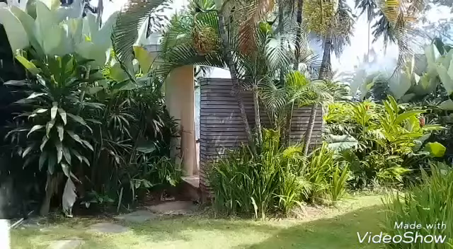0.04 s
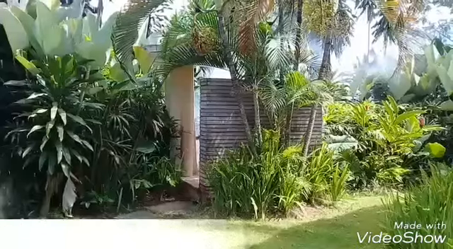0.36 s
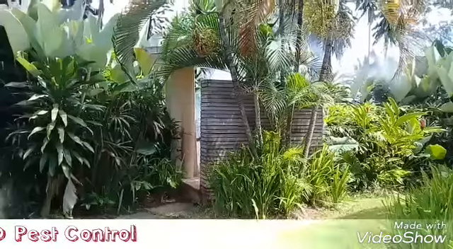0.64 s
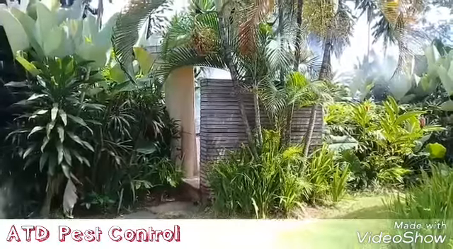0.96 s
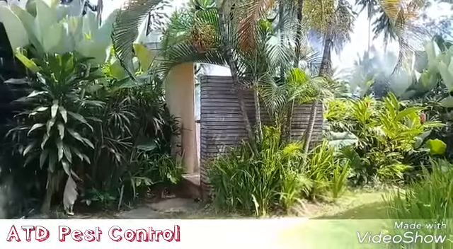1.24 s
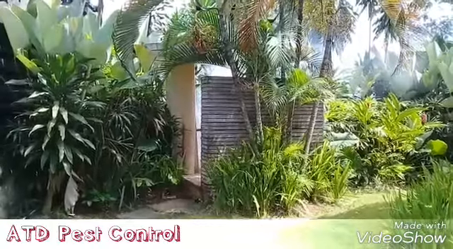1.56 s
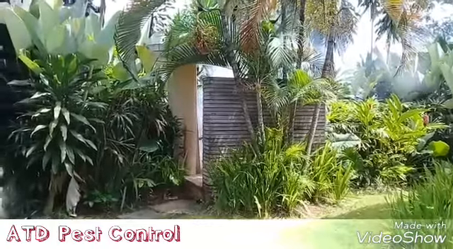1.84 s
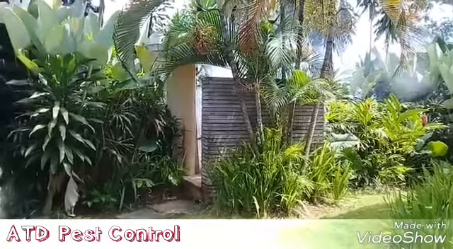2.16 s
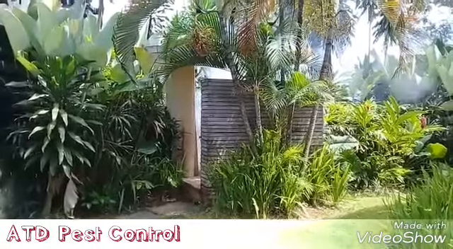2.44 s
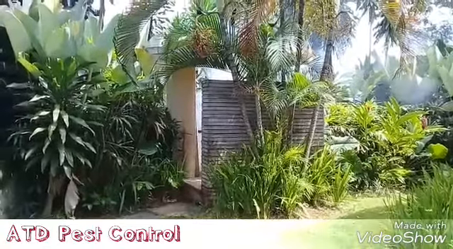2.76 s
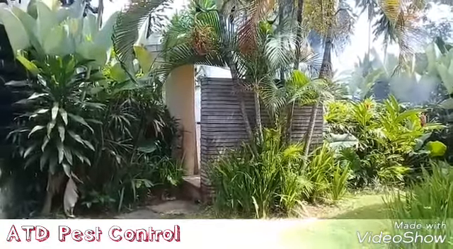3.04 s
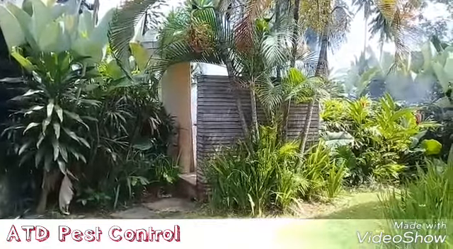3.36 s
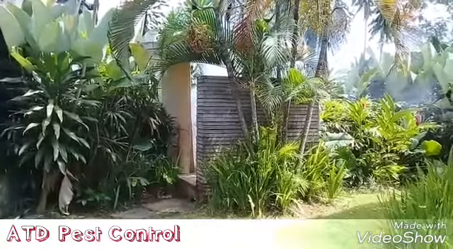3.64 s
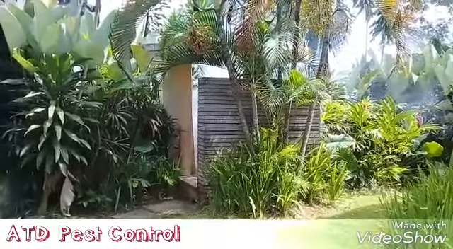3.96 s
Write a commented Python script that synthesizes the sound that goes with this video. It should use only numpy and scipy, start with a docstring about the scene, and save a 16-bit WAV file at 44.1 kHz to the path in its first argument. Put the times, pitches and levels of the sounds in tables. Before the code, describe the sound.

A pulse-jet fogging machine runs in a garden. After silence, it fades in from about 0.4 seconds and reaches full level by 0.7 seconds. It then roars continuously until the end at about 4 seconds, its very rapid firing merging into a low, rough buzz of steady pitch. A hollow ring from the pipe and a rushing nozzle hiss accompany the drone, wavering only slightly in loudness.

```python
"""After a brief silence, the sound of a pulse-jet fogging machine in a garden fades in.
It then runs steadily to the end, firing about 81 times a second. The periodic swing of its gas
column drones, and each firing strikes the exhaust's resonances with a bark. The turbulent exhaust
rings the modes of the long fogging pipe, then leaves the nozzle as a hissing jet."""
import sys
import numpy as np
from scipy import signal
from scipy.fft import rfft, irfft
from scipy.io import wavfile

SR = 44100
rng = np.random.default_rng(int(sys.argv[2]) if len(sys.argv) > 2 else 0)


def inscribe(sig):
    """Save sig as 16-bit PCM at rate SR to the path in sys.argv[1].

    A 1-D sig is mono; a 2-D sig holds one channel per row.
    Samples are clipped to [-1, 1] before scaling.
    """
    pcm = np.round(np.clip(np.atleast_2d(sig).T, -1, 1) * 32767)
    wavfile.write(sys.argv[1], SR, pcm.astype(np.int16))


N = 176400
TIME_S = np.arange(N) / SR
FADE_START_S, FADE_S = 0.43, 0.31
FIRING_PHASE = 0.6   # place of the firing in its cycle, 0 to 1

# Loudest harmonic, the third, before trim: time_s, level_db
THIRD_LEVEL = [(0.74, -12), (0.77, -12), (1.31, -9.5), (1.5, -11), (1.63, -9), (2.48, -8), (2.88, -11),
               (2.95, -9.5), (3.15, -13), (3.47, -9.5), (3.92, -12), (3.95, -11.5)]
# Its neighbours, before trim: time_s, first_db, second_db, fourth_db, fifth_db
NEIGHBOUR_LEVELS = [(0.76, -18.5, -15.5, -30, -28.5), (1.28, -20.5, -18.5, -23, -29),
                    (1.72, -18, -23, -24.5, -22.5), (1.84, -19, -21, -32, -40),
                    (1.95, -18, -22.5, -25, -32.5), (2.83, -19.5, -22.5, -26, -28.5),
                    (2.96, -18, -25, -19.5, -36), (3.13, -15.5, -19.5, -20, -34),
                    (3.84, -18.5, -24, -23, -31.5), (3.9, -21, -25, -31.5, -25.5)]
# Harmonics one to five, a row each: trim_db, flutter_db
HARMONIC_TRIMS = [(0, 0.43), (-0.55, 0.5), (0, 0.58), (-0.1, 0.6), (-2.5, 2.3)]
# Harmonics six to nine, before swell and flutter: level_db
BUZZ_LEVELS = [-39.5, -37, -34.5, -37]

def drone(cycles):
    """Periodic oscillation: the gas column swings at harmonics of the firing rate."""
    flutter_per_s, buzz_flutter_db, dispersion_rad = 11.6, 1.4, 0.704
    firing_hz = cycles[-1] * SR / N
    first, second, fourth, fifth = curves(NEIGHBOUR_LEVELS)
    third, = curves(THIRD_LEVEL)
    levels_db = []
    for db, (trim_db, flutter_db) in zip((first, second, third, fourth, fifth), HARMONIC_TRIMS):
        levels_db.append(db + trim_db + flutter_db * drift(flutter_per_s))
    for k, db in enumerate(BUZZ_LEVELS, 6):
        levels_db.append(db + swell_db(k * firing_hz) + buzz_flutter_db * drift(flutter_per_s))
    tone = np.zeros(N)
    for k, db in enumerate(levels_db, 1):
        shift_rad = dispersion_rad * (k - 3) ** 2   # dispersion in the pipe, about the third harmonic
        tone -= np.sqrt(2) * from_db(db) * np.cos(2 * np.pi * k * cycles + shift_rad)
    return tone


# Exhaust resonances, before swell: pitch_hz, width_hz, level_db
EXHAUST_MODES = [(401.5, 39, -40.5), (509, 56, -43.5), (696, 99, -37.5), (1090, 150, -41)]

def bark(cycles):
    """Impulse response: each firing, uneven in time and strength, strikes the exhaust's resonances."""
    jitter_s, spread_db = 0.00013, 4
    count = int(cycles[-1])
    start_s = np.interp(np.arange(count) + FIRING_PHASE, cycles, TIME_S)
    lateness, strength = rng.standard_normal((count, 2)).T
    onsets = ((start_s + jitter_s * lateness) * SR).astype(int)
    pulses = np.zeros(N)
    pulses[np.clip(onsets, 0, N - 1)] = from_db(spread_db * strength)
    return ring(pulses, EXHAUST_MODES)


# Standing waves of the fogging pipe, before swell: pitch_hz, width_hz, level_db
PIPE_MODES = [(360, 28, -29), (416.6, 25, -33.5), (737.8, 32, -35), (908, 25, -37), (1074, 13.4, -36.5),
              (1105.3, 25.4, -33.5), (1295.6, 29.4, -37), (1484, 37, -39.5), (1627, 35, -38.5),
              (1822, 12.5, -39.5), (1963, 56, -41), (2010, 71, -38.5), (2188, 33, -38), (2390, 48, -44),
              (2590, 70, -41.5), (2735, 67, -47), (2878, 34, -50), (3276, 92, -48)]

def pipe(cycles):
    """Forced resonance: puffs of turbulence sustain the pipe's standing waves."""
    return ring(turbulence(cycles, depth=0.36), PIPE_MODES)


# Spectral density of the jet: frequency_hz, density_db_per_hz
JET_SPECTRUM = [(20, -75), (45, -68), (65, -53), (100, -58.5), (150, -52.5), (185, -53.5), (280, -50.5),
                (450, -56.5), (680, -55), (830, -56), (1200, -58.5), (1400, -63), (1900, -64.5),
                (2400, -62.5), (2750, -63.5), (3050, -66), (4000, -72), (5000, -75), (6200, -80.5),
                (8000, -81), (11200, -87), (12200, -97), (15000, -93.5)]
# Rise and fall of the whole jet, taken about its mean: time_s, level_db
JET_SWELL = [(0.76, -36), (1.19, -37.5), (1.21, -35.5), (2.02, -37.5), (2.73, -35), (2.74, -35.5),
             (3.95, -35)]

def jet(cycles):
    """Turbulent mixing: the nozzle radiates broadband noise, each octave flickering on its own."""
    flicker_db, flicker_per_s = 1.14, 12
    octave = np.log2(np.maximum(np.fft.rfftfreq(N, 1 / SR), 1))
    hz, db = np.transpose(JET_SPECTRUM)
    density = from_db(np.interp(octave, np.log2(hz), db))
    spectrum = rfft(turbulence(cycles, depth=0.06)) * density * np.sqrt(SR / 2)
    hiss = np.zeros(N)
    for centre in range(4, 15):   # octaves from 16 Hz to 16 kHz
        band = irfft(spectrum * np.maximum(1 - abs(octave - centre), 0), N)
        hiss += band * from_db(flicker_db * drift(flicker_per_s))
    level_db, = curves(JET_SWELL)
    return hiss * from_db(level_db - level_db.mean())


# Four frequency bands of the pipe's ring: low_hz, high_hz
SWELL_BANDS = [(300, 390), (600, 800), (1000, 1200), (1900, 2250)]
# Their rise and fall, taken about the mean: time_s, lowest_db, second_db, third_db, highest_db
BAND_SWELLS = [(0.8, -30.5, -29.5, -36, -35), (0.94, -27.5, -27, -39.5, -33),
               (1.28, -29.5, -31, -31.5, -34), (1.43, -24.5, -24, -29.5, -33),
               (1.89, -31.5, -22.5, -32, -33.5), (2.06, -35, -28, -27, -29.5),
               (2.19, -25, -25.5, -21.5, -29), (2.22, -26, -25.5, -34, -39), (2.39, -26.5, -25, -24.5, -33),
               (2.52, -30, -30, -37, -31), (2.9, -25, -35.5, -26, -37), (3.1, -20.5, -23, -32, -26),
               (3.26, -27.5, -27.5, -32.5, -35.5), (3.52, -25.5, -31.5, -28.5, -32),
               (3.67, -26, -22.5, -34.5, -39.5), (3.9, -35.5, -26.5, -31.5, -30.5)]

def swell_db(hz):
    """Slow amplitude modulation: a partial follows its band's curve, or else wavers at random."""
    waver_db, waver_per_s = 2.5, 5.2
    fade_end = int(SR * (FADE_START_S + FADE_S))
    for (low_hz, high_hz), level_db in zip(SWELL_BANDS, curves(BAND_SWELLS)):
        if low_hz < hz < high_hz:
            return level_db - level_db[fade_end:].mean()
    return waver_db * drift(waver_per_s)


def turbulence(cycles, depth):
    """Modulated noise: the flow puffs once per firing."""
    puffs = 1 + depth * np.cos(2 * np.pi * (cycles - FIRING_PHASE))
    return unit_rms(rng.standard_normal(N) * puffs)


def ring(drive, modes):
    """Modal superposition: damped resonances add, each applied twice for steep skirts."""
    sound = np.zeros(N)
    for hz, width_hz, db in modes:
        radius = np.exp(-np.pi * width_hz * np.sqrt(2) / SR)
        section = [1 - radius, 0, radius - 1, 1, -2 * radius * np.cos(2 * np.pi * hz / SR), radius ** 2]
        response = unit_rms(signal.sosfilt([section, section], drive))
        sound += from_db(db + swell_db(hz)) * response
    return sound


def drift(per_s):
    """Low-passed noise: a smooth random wander of spread 1."""
    hop, settling = 40, 2000
    pole = np.exp(-2 * np.pi * per_s * hop / SR)
    noise = rng.standard_normal(N // hop + settling + 2)
    slow = signal.lfilter([1], [1, -2 * pole, pole ** 2], noise)[settling:]
    return np.interp(np.arange(N) / hop, np.arange(len(slow)), unit_rms(slow - slow.mean()))


def curves(rows):
    """Linear interpolation of each column against time."""
    time_s, *columns = np.transpose(rows)
    return [np.interp(TIME_S, time_s, column) for column in columns]


def from_db(db):
    """Decibels to amplitude ratio."""
    return 10 ** (np.asarray(db) / 20)


def unit_rms(x):
    """Normalisation to unit power."""
    return x / np.sqrt(np.mean(x ** 2) + 1e-20)


# Third harmonic of the firing rate: time_s, pitch_hz
THIRD_PITCH = [(0.45, 242.7), (0.88, 239.4), (0.94, 244.4), (1.99, 243), (2.03, 240.7), (2.78, 241.1),
               (2.99, 242.2), (3.04, 244.1), (3.97, 243.6)]

def scene():
    """Superposition: one firing cycle, wobbling with unsteady combustion, drives all four layers."""
    third_hz, = curves(THIRD_PITCH)
    firing_hz = third_hz / 3 * (1 + 0.0068 * drift(per_s=36))
    cycles = np.cumsum(firing_hz) / SR
    return (drone(cycles) + bark(cycles) + pipe(cycles) + jet(cycles))[None]


def record(dry):
    """Band limiting: the sound fades in, is clipped at full scale and passes a steep low-pass."""
    cutoff_hz = 15600
    fade = np.clip((TIME_S - FADE_START_S) / FADE_S, 0, 1) ** 0.97
    low_pass = signal.cheby2(12, 70, cutoff_hz, fs=SR, output="sos")
    return signal.sosfilt(low_pass, np.clip(dry * fade, -1, 1))


dry = scene()
out = record(dry)
inscribe(out)
```